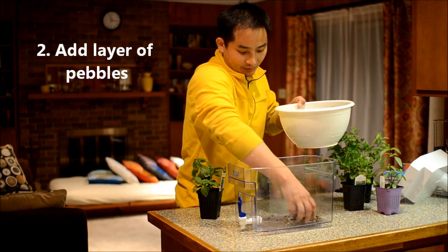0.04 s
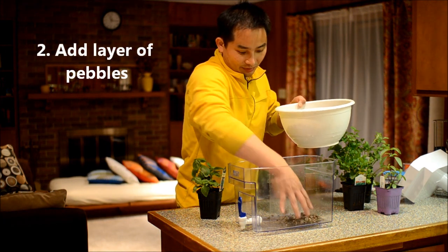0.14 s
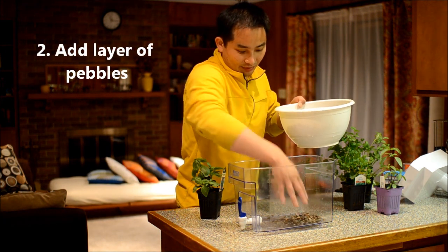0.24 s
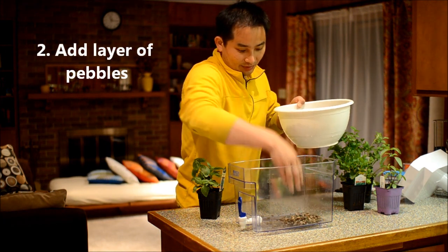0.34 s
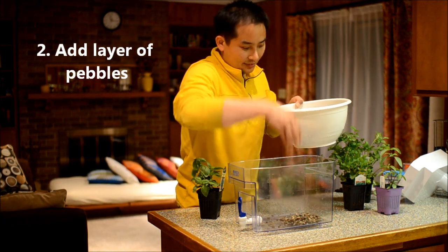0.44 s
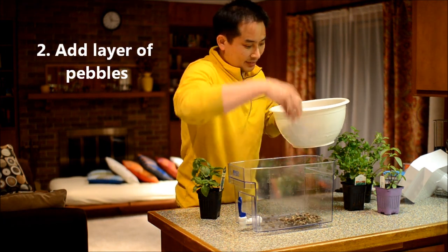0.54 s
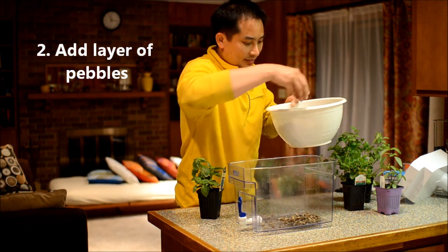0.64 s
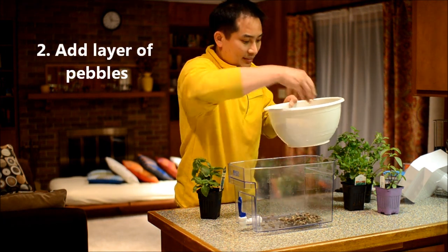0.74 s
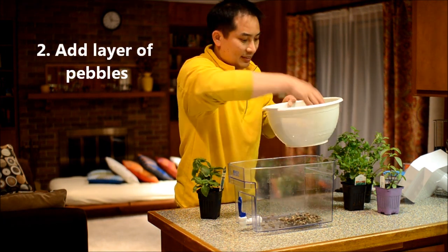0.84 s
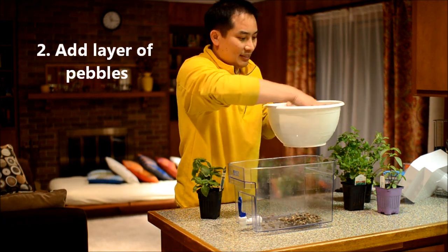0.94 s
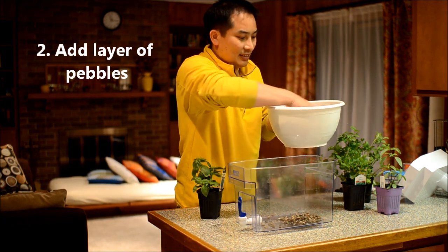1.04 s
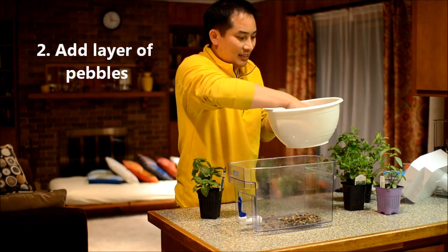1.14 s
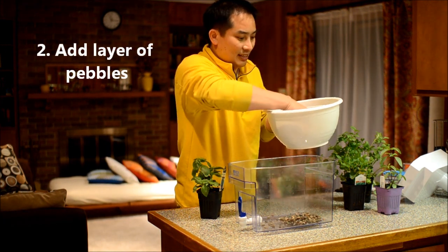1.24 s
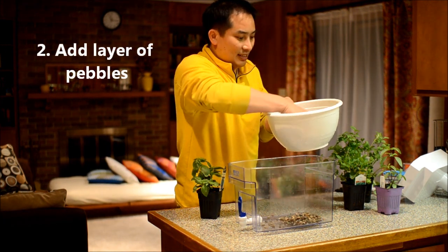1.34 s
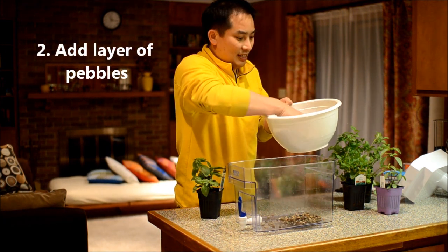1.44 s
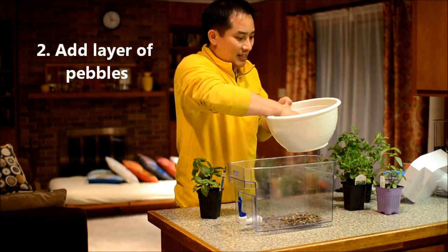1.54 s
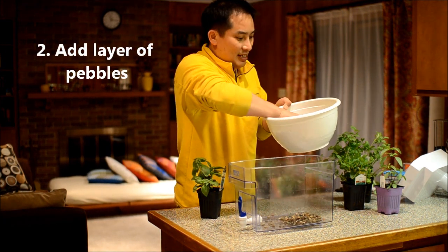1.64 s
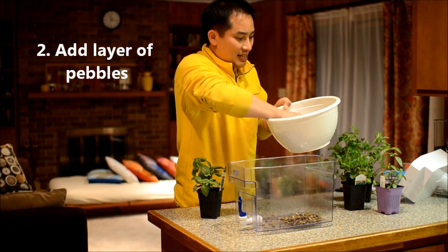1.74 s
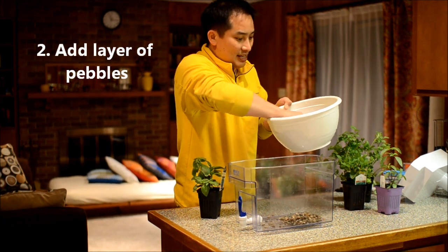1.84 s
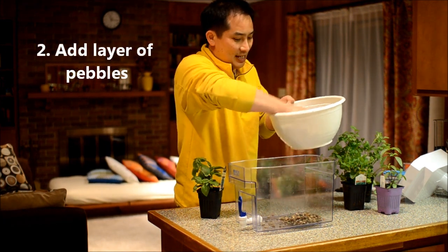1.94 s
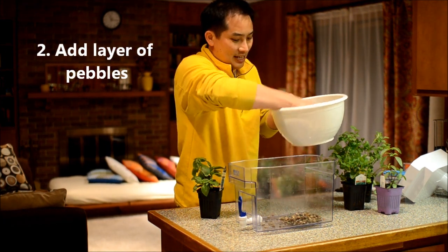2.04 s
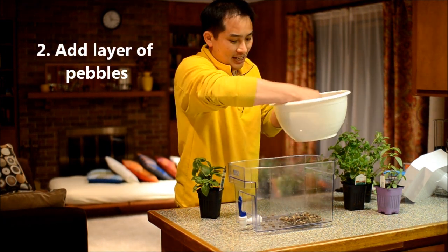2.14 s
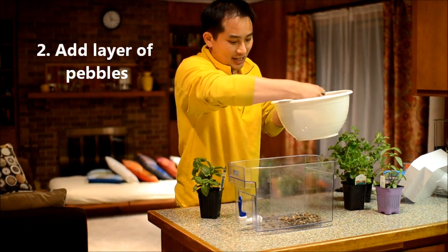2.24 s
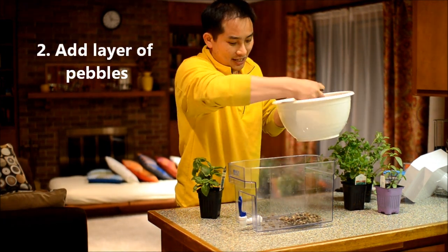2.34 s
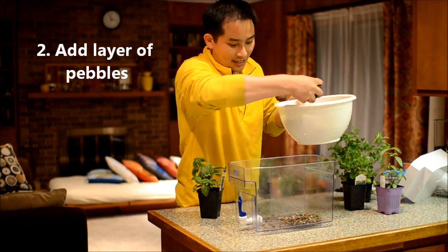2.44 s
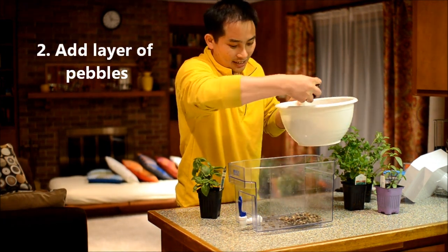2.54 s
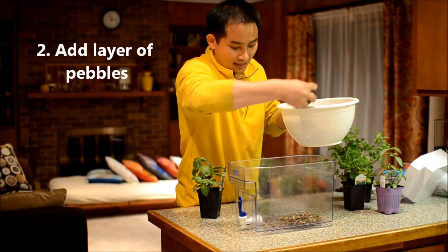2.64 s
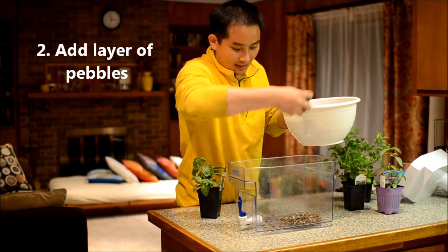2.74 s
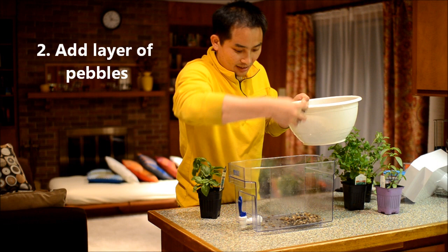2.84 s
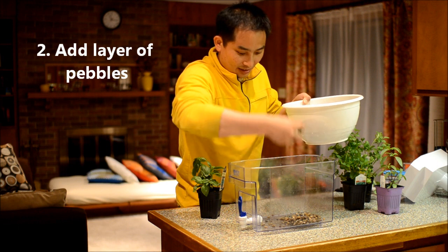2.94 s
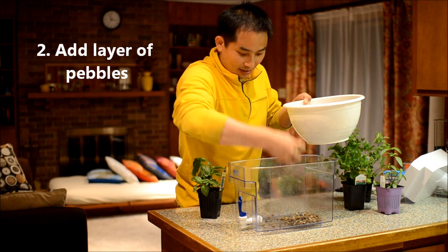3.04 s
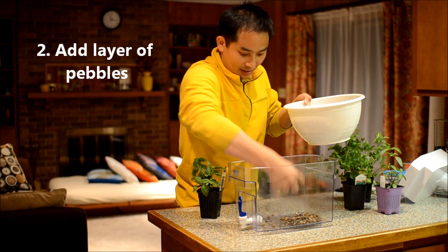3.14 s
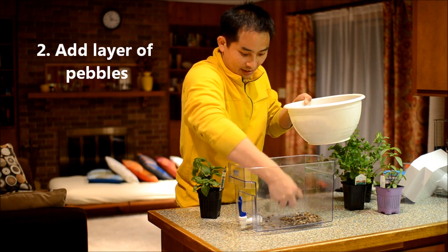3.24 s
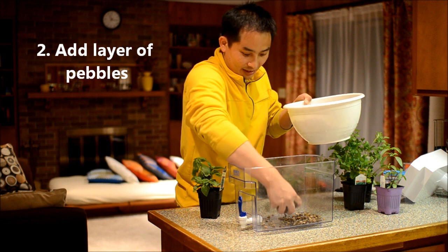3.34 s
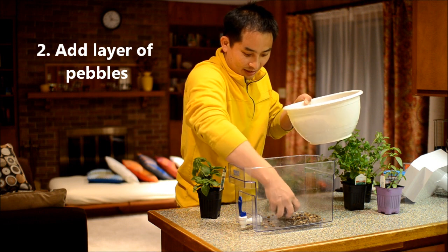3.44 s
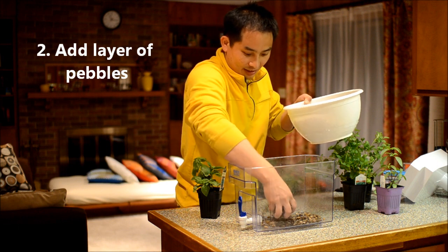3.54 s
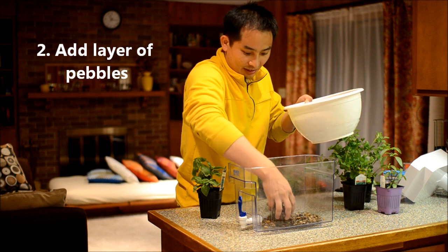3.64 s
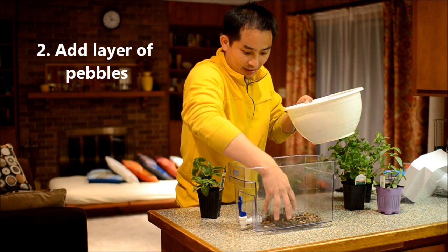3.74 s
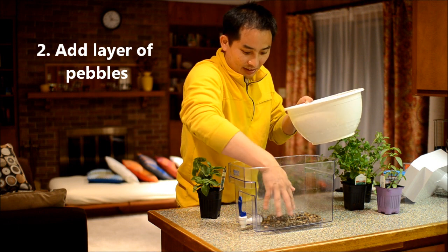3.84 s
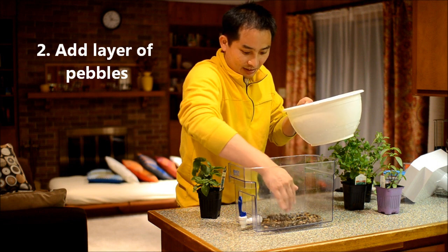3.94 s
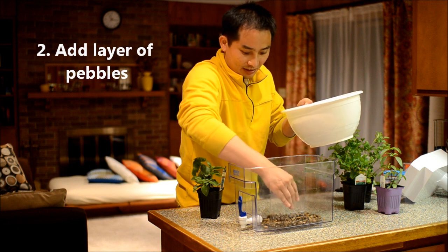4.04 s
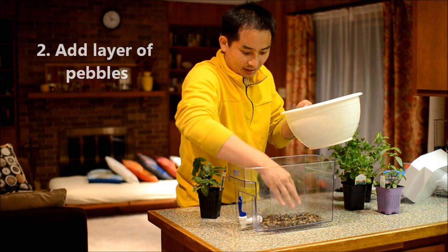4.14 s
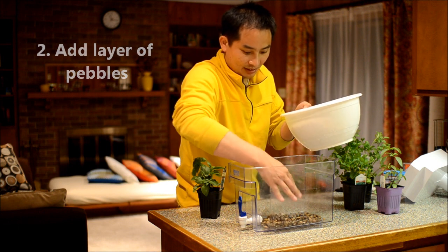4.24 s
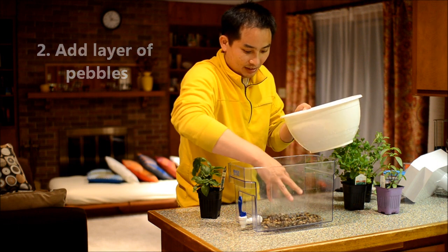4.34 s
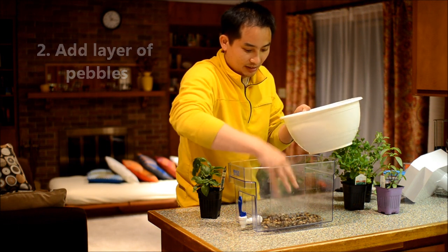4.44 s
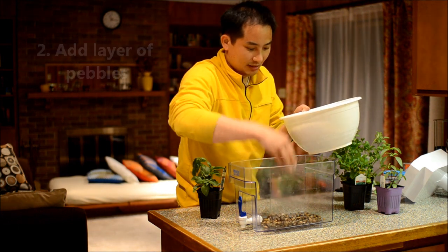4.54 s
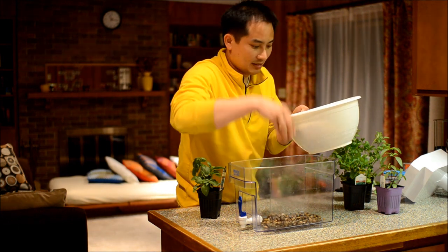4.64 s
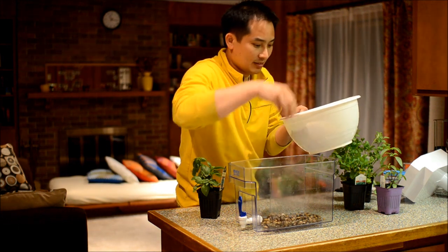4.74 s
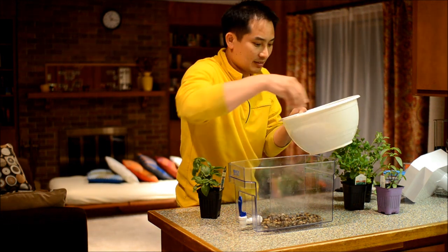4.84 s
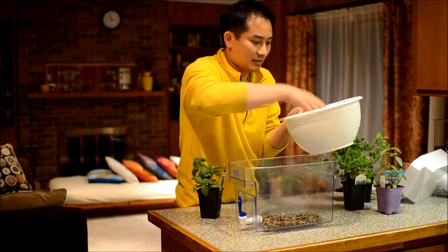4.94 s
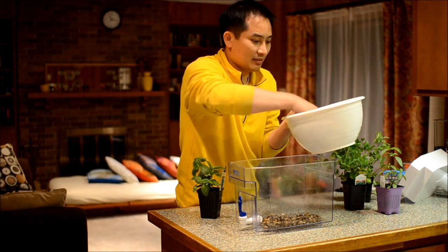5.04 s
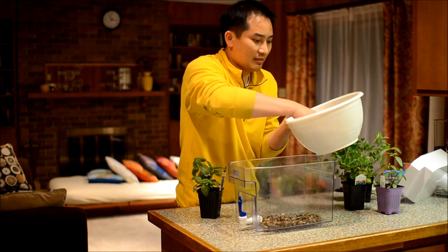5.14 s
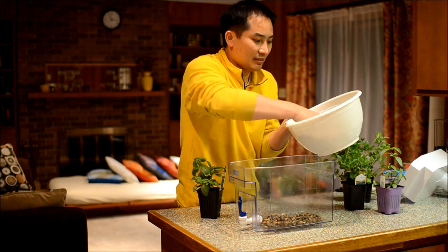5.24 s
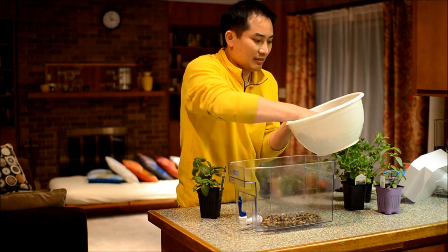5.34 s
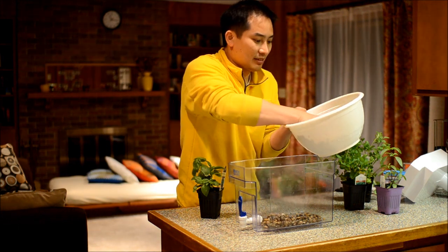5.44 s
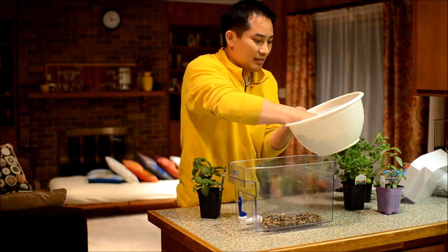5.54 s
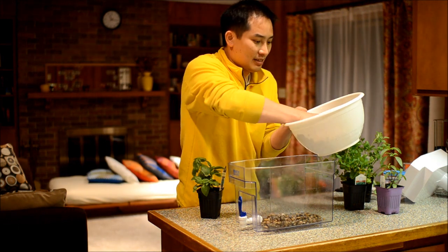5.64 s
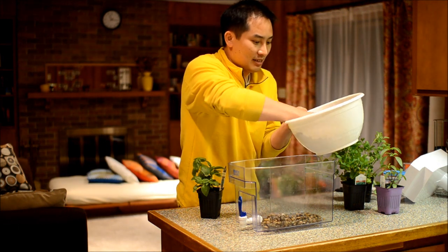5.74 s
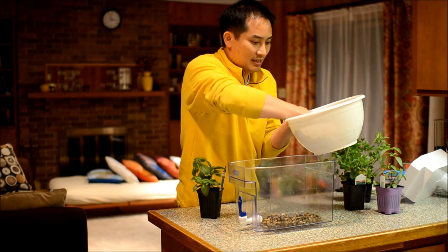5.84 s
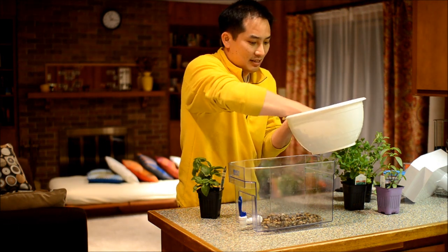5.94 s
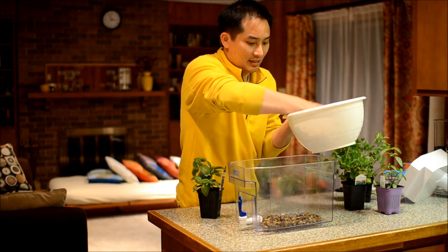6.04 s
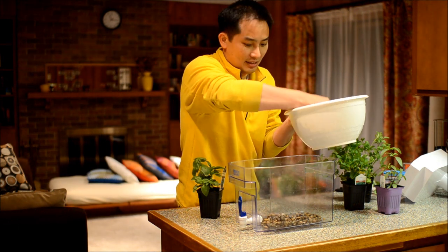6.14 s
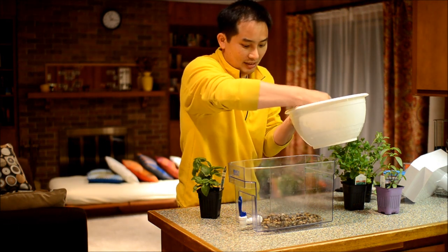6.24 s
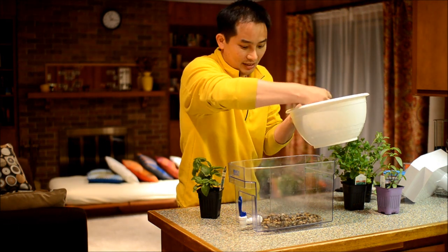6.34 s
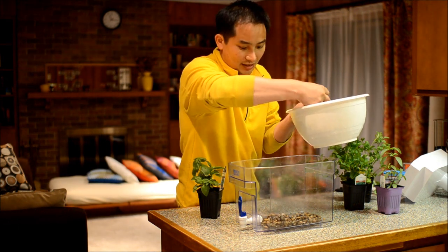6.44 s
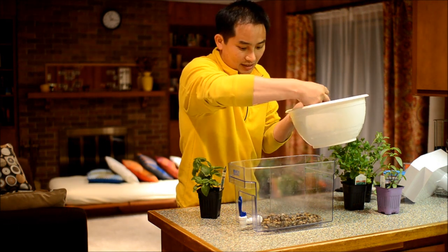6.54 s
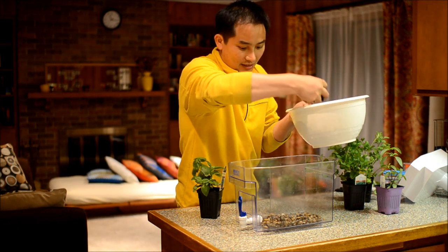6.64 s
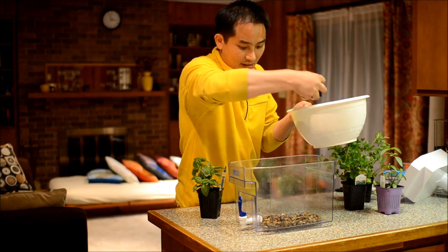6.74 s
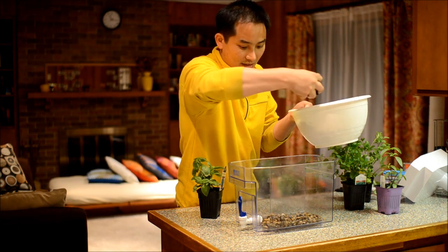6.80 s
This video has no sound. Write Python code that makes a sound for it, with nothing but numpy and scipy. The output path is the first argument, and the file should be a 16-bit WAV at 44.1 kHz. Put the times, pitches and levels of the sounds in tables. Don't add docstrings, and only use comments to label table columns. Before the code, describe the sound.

Close, dry indoor handling of gravel: a sharp plastic clatter at once, thinning to scattered clinks, then duller crunchy scraping and knocks inside a bowl. Quiet ticks lead to the loudest event, a dense hard spill of stones into a hollow plastic box, slightly overloaded. It fades into small clicks, then more muted stirring and scooping in the bowl, ending in sparse ticks over soft hiss.

```python
import sys
import numpy as np
from scipy import signal
from scipy.fft import rfft, irfft
from scipy.io import wavfile
from scipy.ndimage import uniform_filter1d

SR = 44100
rng = np.random.default_rng(int(sys.argv[2]) if len(sys.argv) > 2 else 0)


def put_to_file(sound):
    columns = np.atleast_2d(sound).T
    safe = np.clip(columns, -1, 1)
    whole_steps = np.round(safe * 32767)
    wavfile.write(sys.argv[1], SR, whole_steps.astype(np.int16))


def ratio(d):
    e = np.asarray(d, float) / 20
    return 10 ** e


N = 302967

# (frequency [Hz], spectral density [dB per Hz])
TANK_COLOUR = [(140, -49.5), (230, -32.5), (330, -18), (520, -8), (680, -11.5), (900, -13), (1150, 0.5),
               (1500, -5.5), (2000, -0.5), (4650, -4.5), (5740, -9.5), (7720, -7.5), (10000, -15),
               (15000, -40)]
LEVEL_BOWL_COLOUR = [(140, -54.5), (230, -20), (430, -11.5), (680, -14), (964, -9.5), (1910, -5.5),
                     (2520, -3.5), (4600, -10.5), (5740, -16), (7860, -17), (15000, -42)]
TILTED_BOWL_COLOUR = [(140, -63.5), (230, -28.5), (420, -17), (838, -13.5), (1020, -6.5), (1230, -14.5),
                      (2150, -4.5), (2520, -7), (4300, -11), (5740, -18), (8140, -20), (15000, -45.5)]
# (frequency [Hz], peak height [dB], t60 [s])
TANK_MODES = [(209, -4, .3), (361, 2, .15), (573, 13, .15), (987, 6, .15), (1042, 5, .12), (1133, 6, .12),
              (1190, 8, .12), (1230, 4, .1), (1371, 4, .1), (1643, 4, .1), (1765, 1, .1), (1932, 3, .08)]
LEVEL_BOWL_MODES = [(352, -2.5, 0.056), (491, -16.5, 0.1), (1010, -1, .08), (1880, -3.5, .03),
                    (1985, 3, 0.2), (2110, 9.5, 0.08), (2635, -8.5, 0.066)]
TILTED_BOWL_MODES = [(217, 2.5, 0.416), (430, -3, 0.38), (531, -10, 0.16), (773, -36, 0.16),
                     (983, -14, 0.18), (1073, 1, 0.14), (2090, -11.5, 0.066), (2210, -3.5, 0.018),
                     (348, -8, 0.081), (2660, -43, 0.15), (3150, -7, 0.051)]
WALL_CUT_HZ = 257.4
BOOM_HZ, CLINK_HZ = 900, 5500

# (start [s], length [s], force at start [dB], force at end [dB], stone clink re wall rattle [dB])
TANK_SURGES = [(-.02, 0.11, -13, -13, -3), (.135, 0.24, -14.5, -22, -4), (.44, 0.23, -34, -43, -7.5),
               (.82, 0.0072, -35, -35, -4), (3.19, .03, -28, -33.5, 3.5), (3.252, 0.0086, -14, -14, -3.5),
               (3.372, 0.033, -8, -23, -5.5), (3.442, 0.01, -6.5, -12, -4), (3.4, 0.045, -19.5, -21, 1),
               (3.45, 0.39, -16.5, -13.5, -6.5), (3.69, 0.073, -12, -28, -7),
               (3.865, 0.048, -21, -24, -7.5), (3.96, 0.084, -37.5, -30, -27),
               (4.126, 0.015, -44.5, -41.5, -11), (4.24, 0.062, -57.5, -47, -19),
               (4.335, 0.037, -39, -53, -16), (4.418, 0.033, -39, -57, -23.5)]
LEVEL_BOWL_SURGES = [
    (.9, 0.099, -36.5, -36, -12),
    (.975, 0.12, -26, -21.5, -6),
    (1.23, 0.083, -26.5, -24, -6.5),
    (1.44, 0.11, -41.5, -48.5, -15),
    (1.535, 0.039, -31.5, -23.5, -5),
    (1.59, 0.22, -27, -26.5, -4),
    (1.79, 0.1, -44, -30.5, -6.5),
    (1.998, 0.023, -34, -46.5, -2),
    (2.29, 0.039, -62, -55.5, -4),
    (2.628, 0.015, -33.5, -48, -14.5),
]
TILTED_BOWL_SURGES = [(4.86, 0.079, -62, -63, -9), (4.944, 0.021, -36.5, -39.5, -6.5),
                      (5.001, 0.054, -42.5, -29, -13), (5.15, 0.04, -33, -20.5, -6.5),
                      (5.2, 0.32, -25, -29, -6), (5.558, 0.026, -25.5, -22.5, -2.5),
                      (5.609, 0.1, -20.5, -18.5, -8), (5.75, 0.063, -33.5, -27.5, -6.5),
                      (5.93, .11, -43.5, -44.5, 4), (6.106, 0.014, -42, -41, 1),
                      (6.15, 0.021, -32.5, -40.5, -5), (6.28, 0.076, -52.5, -56, 1),
                      (6.536, 0.019, -42, -51.5, -1.5), (6.63, 0.11, -55, -66, -7.5)]
RISE_DB_PER_S, SETTLE_CLINK_DB = 1999.5, 7
CUSHION_MOST_DB = 14
TANK_DROP_DB_PER_S, TANK_SETTLE_DB, TANK_SETTLE_DB_PER_S = 195, -21, 77
TANK_BOOM_DB, TANK_CUSHION_DB_PER_S = -7.5, 38.5
BOWL_DROP_DB_PER_S, BOWL_SETTLE_DB, BOWL_SETTLE_DB_PER_S = 192.5, -17, 51
BOWL_BOOM_DB, BOWL_CUSHION_DB_PER_S = -13, 18

# (time [s], peak level [dB], clink re peak [dB], struck patch of wall [Hz])
ON_BARE_FLOOR = [
    (0.2967, -3.5, 5.5, 3140),
    (3.0102, 6.5, -0.5, 1930),
    (3.1652, 2.5, 4, 1980),
    (3.246, 1, -0.5, 1940),
    (3.3687, 1.5, 3, 4550),
    (3.702, 5.5, -12, 2600),
    (3.8082, 6, -10.5, 1180),
    (3.8576, 2.5, -5.5, 2540),
]
ON_LAYER = [(0.0684, 7, -9.5, 1245), (0.093, -3, -7, 4130), (0.1371, 5.5, 1, 4510),
            (0.1837, 3.5, -19, 1960), (0.3855, -11, 8.5, 1187), (0.514, -16.5, -6, 1976),
            (0.5673, -13, 6, 2110), (0.5969, -24.5, 21, 4410), (0.7048, -19, 8, 2850),
            (0.7721, -20.5, 5, 3420), (3.0433, -5.5, -0.5, 4490), (3.1144, -12.5, 2.5, 3210),
            (3.2625, -7, 11.5, 1200), (3.2944, 4, 0, 997), (3.4351, 14, -21, 1188),
            (3.5389, 10.5, -4.5, 1102), (4.0375, -16, -1, 2310), (4.0608, -14, -25, 2560),
            (4.1228, -10, -13, 3160), (4.1505, -9, -12, 1210), (4.3066, -34, -20, 2230),
            (4.3316, -25, -1.5, 2920), (4.4134, -30.5, -10, 2430)]
IN_LEVEL_BOWL = [(0.8183, -19.5, -8, 1140), (0.8544, -21, -18, 2520), (0.9336, -20, 1, 2090),
                 (0.9818, -15.5, -7, 2050), (1.0311, -2, -2, 2090), (1.1144, -3, -20, 2010),
                 (1.5773, -20, -16, 1880), (1.9955, -15.5, 1, 2300), (2.2654, -51, 20.5, 5600),
                 (2.2897, -25, -27, 1023), (2.4694, -48, 8, 2010), (2.5192, -47.5, 10, 2980),
                 (2.7697, -56.5, -10, 1980)]
IN_TILTED_BOWL = [(4.572, -59.5, 10.5, 2330), (4.642, -59.5, 13.5, 2520), (4.694, -57, 12.5, 2400),
                  (4.7494, -46, -16, 1530), (4.879, -39.5, -21, 1510), (4.947, -25.5, 0.5, 2080),
                  (5.4928, -12, -24, 1880), (5.8227, -8.5, 1, 2310), (6.0215, -23, -13, 2460),
                  (6.107, -18, 5, 3240), (6.5095, -35, 9, 3740), (6.5338, -24.5, 11.5, 2210),
                  (6.6268, -29.5, 8.5, 2360), (6.6955, -38, 6, 3690)]
ON_BOWL_BOTTOM = [
    (0.828, -13, 3, 2250),
    (1.234, -20, -13.5, 2100),
    (1.34, -8, -11.5, 2040),
    (1.5302, -14, -8.5, 1940),
    (2.6189, -14, -20, 2046),
    (5.0204, -21.5, -2, 1835),
    (5.1755, -17.5, -10.5, 1900),
    (6.1459, -11.5, 3, 2280),
]
BARE_BOOM_DB, LAYER_BOOM_DB, BOWL_BLOW_BOOM_DB, BOTTOM_BOOM_DB = -8.5, -26.5, -26.5, -13.5
TANK_CLUSTER_MS, BOWL_CLUSTER_MS = 4.1, 2.5

# (frequency [Hz], t60 [s])
ROOM_DECAY = [(250, 0.6), (1000, 0.38), (4000, 0.29), (12000, 0.15)]
# (delay [ms], gain [ratio])
ECHOES = [(1.3, 0.51), (3.1, 0.88), (5.4, 1), (8.2, -0.87), (13.5, -.4), (23.5, -0.29)]

# (frequency [Hz], spectral density [dB per Hz])
HISS_COLOUR = [(18, -31.5), (30, -8), (415, -5.5), (485, -7), (629, -13), (716, -10), (5730, -26),
               (9390, -27), (15000, -39.5)]
HISS_DB, HUM_HZ, HUM_DB = -66.5, 49, -83.5

TILT_S = 4
# (time [s], level [dB])
BUMPS = [
    (5.398, -34),
    (5.436, -19),
]
# (frequency [Hz], level [dB], t60 [s])
BUMP_MODES = [(54.6, -29, 0.25), (130, -31, .2), (210.7, -19, 0.6), (232, -27, .3), (344, -11, 0.079),
              (425, -6, 0.05), (480, -20, .25), (525, 2, 0.05)]
BUMP_RISE_CYCLES, GRIP_S, GRIP_DB_PER_S = 2.4, 5.528, 898.5

# (frequency [Hz], width [Hz], depth [0-1])
HOUSING = [(5690, 410, 1), (6960, 230, 0.96)]
EDGE_HZ = 14100


def unit(x):
    return x / np.linalg.norm(x, axis=-1, keepdims=True)


def read(points, hz):
    f, value = np.transpose(points)
    return np.interp(np.log(hz + 1), np.log(f + 1), value)


def causal(db):
    full_circle = np.r_[db, db[-2:0:-1]]
    log_gain = np.log(ratio(np.maximum(full_circle, -100)))
    return np.fft.ifft(np.exp(signal.hilbert(log_gain).conj())).real


def surges(rows, drop_db_per_s, settle_db, settle_db_per_s, boom_db, cushion_db_per_s):
    t, power = np.arange(0, N + 64, 64) / SR, 1e-12
    for start, length, first_db, last_db, clink_db in rows:
        end = start + length
        after = np.maximum(t - end, 0)
        held_db = np.interp(t, [start, end], [first_db, last_db])
        held_db = held_db - RISE_DB_PER_S * np.maximum(start - t, 0)
        drop = ratio(held_db - drop_db_per_s * after) ** 2
        settle = ratio(held_db + settle_db - settle_db_per_s * after) ** 2
        cushion_db = np.clip(cushion_db_per_s * (t - start), 0, CUSHION_MOST_DB)
        clink = ratio(clink_db) ** 2 * (drop + settle * ratio(SETTLE_CLINK_DB) ** 2)
        boom = drop * ratio(boom_db - cushion_db) ** 2
        power = power + np.array([drop + settle, clink, boom])
    return np.array([np.interp(np.arange(N) / SR, t, 10 * np.log10(p)) for p in power])


def stream(force_db, per_s, spread_db, dense_db, thinning):
    draw = rng.random(N)
    hard = ratio(spread_db * np.minimum(rng.exponential(1, N), 5))
    hard *= rng.choice([-1, 1], N) / np.sqrt(np.mean(hard ** 2))
    chance = per_s / SR * ratio(thinning * np.minimum(force_db[0] - dense_db, 0))
    return ratio(force_db) * (draw < chance) / np.sqrt(chance) * hard


def blows(rows, boom_db, cluster_ms, lift_db, patch, cycles, count=4):
    out, t = np.zeros((3, N + SR)), np.arange(500) / SR
    draws = rng.random((len(rows), 2, count))
    for (s, db, clink_db, hz), (late, size) in zip(rows, draws):
        tick = np.tile(t == 0, (3, 1)).astype(float)
        patch_ring = unit(np.exp(-hz * t / cycles) * np.sin(2 * np.pi * hz * t))
        tick[0] = unit(tick[0] + patch * patch_ring)
        tick *= ratio(db + lift_db + np.array([[0], [clink_db], [boom_db]]))
        delay_s = cluster_ms / 1000 * late * np.sign(np.arange(count))
        at = np.round((s + delay_s) * SR).astype(int)
        forces = unit((.4 + size) * (-.45) ** np.arange(count))
        for i, force in zip(at, forces):
            out[:, i:i + len(t)] += force * tick
    return out[:, :N]


def vessel(colour, modes):
    t = np.arange(16384) / SR
    both = unit(causal(read(colour, np.fft.rfftfreq(len(t), 1 / SR))))
    ring = 0
    for hz, db, t60 in modes:
        height = ratio(db) * 2 * np.log(1000) / (t60 * SR)
        ring = ring + height * ratio(-60 * t / t60) * np.sin(2 * np.pi * hz * t)
    both = signal.sosfilt(signal.butter(6, WALL_CUT_HZ, "high", fs=SR, output="sos"), both + ring)
    cuts = ([BOOM_HZ, CLINK_HZ], "band"), (CLINK_HZ, "high"), (BOOM_HZ, "low")
    bands = [signal.sosfilt(signal.butter(3, *c, fs=SR, output="sos"), both) for c in cuts]
    return unit(np.array(bands))


def pebbles(force, clear, body, contact_t60, count=8):
    t, kind = np.arange(300) / SR, rng.integers(0, count, N)
    contacts = unit(rng.standard_normal((count, len(t))) * ratio(-60 * t / contact_t60))
    rough = 0
    for k, contact in enumerate(contacts):
        rough = rough + signal.oaconvolve(force[:2] * (kind == k), contact[None], axes=1)[:, :N]
    excitation = np.r_[rough, force[2:]] + clear
    return signal.oaconvolve(excitation, body, axes=1)[:, :N].sum(0)


def tank():
    fall = surges(TANK_SURGES, TANK_DROP_DB_PER_S, TANK_SETTLE_DB, TANK_SETTLE_DB_PER_S,
                  TANK_BOOM_DB, TANK_CUSHION_DB_PER_S)
    force = ratio(-4.0) * stream(fall, per_s=1800, spread_db=3.67, dense_db=-30, thinning=0.54)
    strike = dict(cluster_ms=TANK_CLUSTER_MS, lift_db=5.8, patch=0.44, cycles=0.43)
    clear = blows(ON_BARE_FLOOR, BARE_BOOM_DB, **strike) + blows(ON_LAYER, LAYER_BOOM_DB, **strike)
    return pebbles(force, clear, vessel(TANK_COLOUR, TANK_MODES), contact_t60=0.0011)


def hiss():
    noise = irfft(rfft(rng.standard_normal(N)) * ratio(read(HISS_COLOUR, np.fft.rfftfreq(N, 1 / SR))), N)
    waver = 1 + 0.17 * np.sqrt(N) * unit(uniform_filter1d(rng.standard_normal(N), 4000))
    hum = ratio(HUM_DB) * np.sqrt(2) * waver * np.sin(2 * np.pi * HUM_HZ * np.arange(N) / SR)
    return ratio(HISS_DB) * np.sqrt(N) * unit(noise) + hum


def answer(echo_db, scatter_db, tail_db, scatter_t60=0.11):
    taps = np.zeros(SR // 2)
    at = np.arange(20, len(taps) - 20, 20)
    taps[at + rng.integers(0, 20, len(at))] = rng.choice([-1., 1.], len(at))
    hz, t, z = signal.stft(taps, SR, nperseg=256)
    decay = ratio(-60 * t / read(ROOM_DECAY, hz)[:, None])
    out = ratio(tail_db) * unit(signal.istft(z * decay, SR, nperseg=256)[1])
    scatter = unit(taps * ratio(-60 * np.arange(len(taps)) / SR / scatter_t60))
    out[:len(taps)] += ratio(scatter_db) * scatter
    out[0] += 1
    for (ms, share), shift in zip(ECHOES, rng.uniform(.93, 1.2, len(ECHOES))):
        out[round(ms * shift * SR / 1000)] += ratio(echo_db) * share
    return unit(out)


def evened(path, span_hz):
    size = 2 ** 15
    power = uniform_filter1d(abs(rfft(path, size)) ** 2, max(round(span_hz * size / SR), 1))
    inverse = causal(-10 * np.log10(power))[:4096]
    return unit(signal.fftconvolve(path, inverse)[:len(path)])


def room(x, echo_db, scatter_db, tail_db, turns_per_s=4.5, count=3):
    turn = 2 * np.pi * turns_per_s * np.arange(N) / SR
    out = 0
    for k in range(count):
        share = np.sqrt(2 / count) * np.cos(turn + np.pi * k / count)
        path = evened(answer(echo_db, scatter_db, tail_db), span_hz=55)
        out = out + signal.fftconvolve(x * share, path)[:N]
    return out


def bowl():
    stir = surges(LEVEL_BOWL_SURGES + TILTED_BOWL_SURGES, BOWL_DROP_DB_PER_S, BOWL_SETTLE_DB,
                  BOWL_SETTLE_DB_PER_S, BOWL_BOOM_DB, BOWL_CUSHION_DB_PER_S)
    force = ratio(-2.5) * stream(stir, per_s=2800, spread_db=4.0, dense_db=-41.0, thinning=0.5)
    strike = dict(cluster_ms=BOWL_CLUSTER_MS, lift_db=3.35, patch=0.9, cycles=1.5)
    clear = blows(IN_LEVEL_BOWL + IN_TILTED_BOWL, BOWL_BLOW_BOOM_DB, **strike)
    clear = clear + blows(ON_BOWL_BOTTOM, BOTTOM_BOOM_DB, **strike)
    tilted = np.arange(N) > TILT_S * SR
    level_body = vessel(LEVEL_BOWL_COLOUR, LEVEL_BOWL_MODES)
    tilted_body = vessel(TILTED_BOWL_COLOUR, TILTED_BOWL_MODES)
    level_sound = pebbles(force * ~tilted, clear * ~tilted, level_body, contact_t60=0.0042)
    return level_sound + pebbles(force * tilted, clear * tilted, tilted_body, contact_t60=0.0042)


def bumps():
    t, out, ring = np.arange(SR // 2) / SR, np.zeros(N), 0
    for hz, db, t60 in BUMP_MODES:
        rise = np.minimum(t * max(hz, 200) / BUMP_RISE_CYCLES, 1)
        ring = ring + ratio(db - 60 * t / t60) * np.sin(2 * np.pi * hz * t) * rise
    for s, db in BUMPS:
        grip_db = GRIP_DB_PER_S * np.maximum(s + t - GRIP_S, 0)
        out[round(s * SR):][:len(t)] += ratio(db - grip_db) * ring
    return out


def scene():
    vessels = room(tank() + bowl(), echo_db=-1.5, scatter_db=7.5, tail_db=2.5)
    return (vessels + bumps() + hiss())[None]


def low_pass(x):
    return signal.sosfilt(signal.butter(12, 15590, fs=SR, output="sos"), x)


def record(dry):
    x = dry
    for hz, width, depth in HOUSING:
        x = x - depth * signal.lfilter(*signal.iirpeak(hz, hz / width, SR), x)
    x = signal.sosfilt(signal.butter(6, EDGE_HZ, fs=SR, output="sos"), x)
    x = 1.473 * np.tanh(x / 1.033)
    return low_pass(np.clip(x, -1, 1))


dry = scene()
out = record(dry)
put_to_file(out)
```